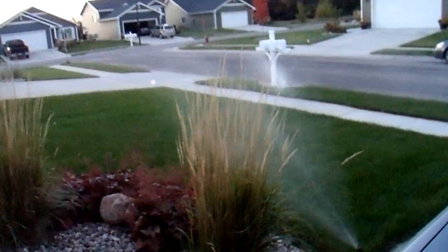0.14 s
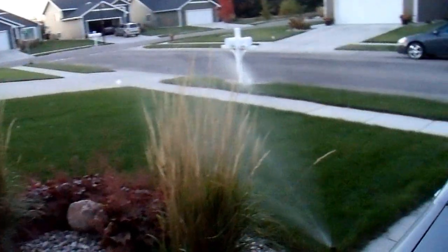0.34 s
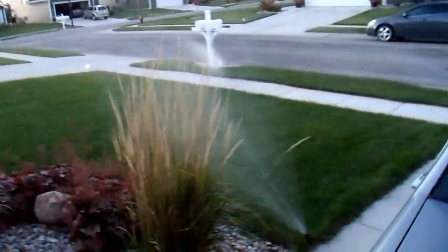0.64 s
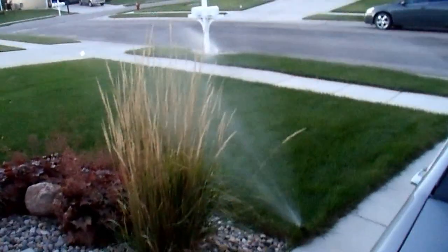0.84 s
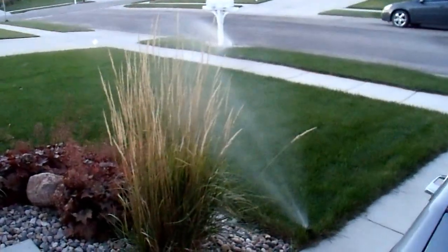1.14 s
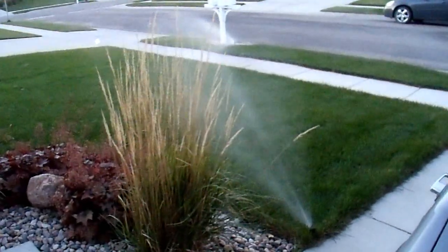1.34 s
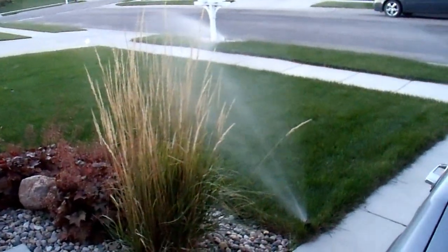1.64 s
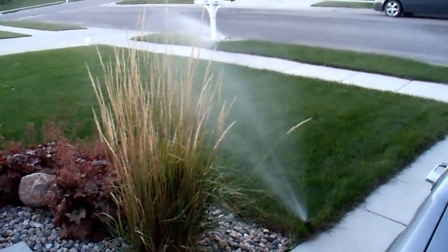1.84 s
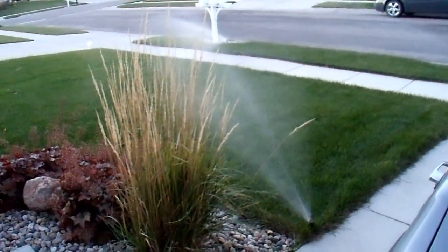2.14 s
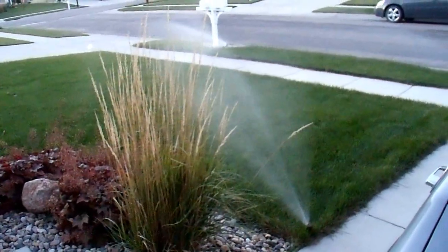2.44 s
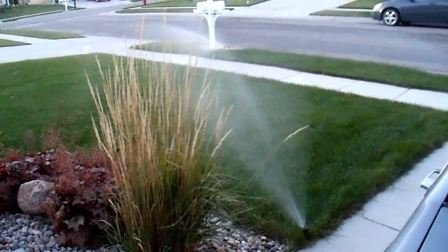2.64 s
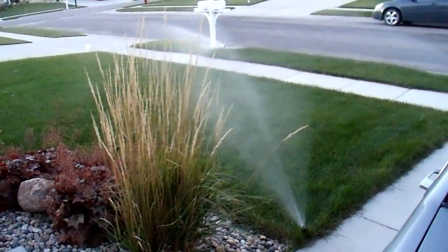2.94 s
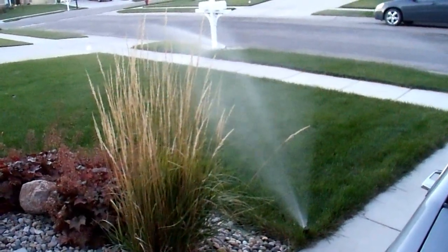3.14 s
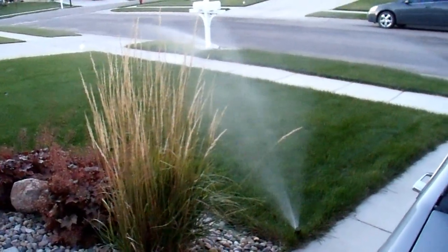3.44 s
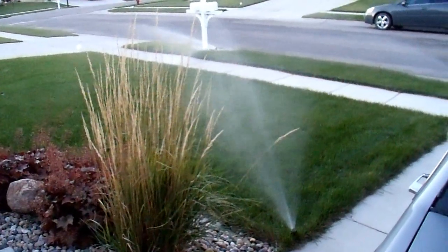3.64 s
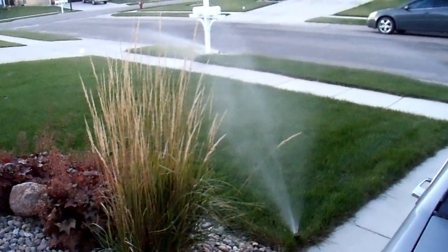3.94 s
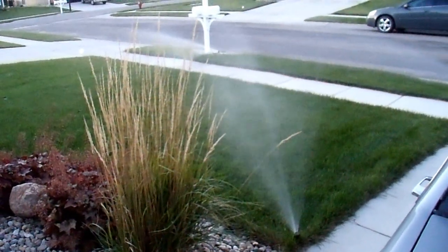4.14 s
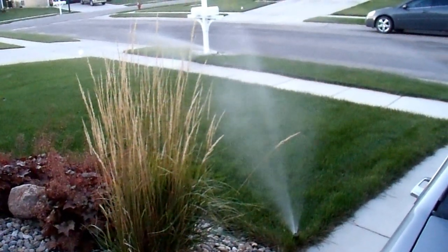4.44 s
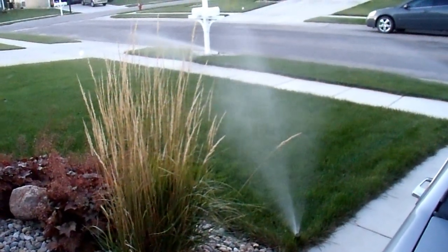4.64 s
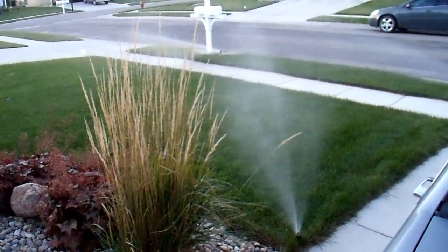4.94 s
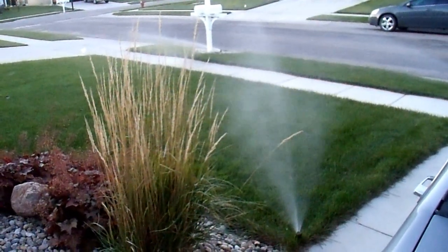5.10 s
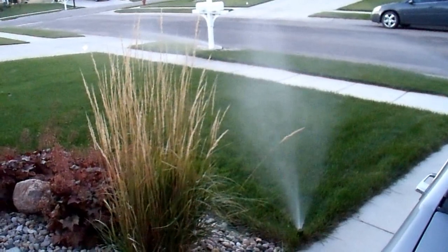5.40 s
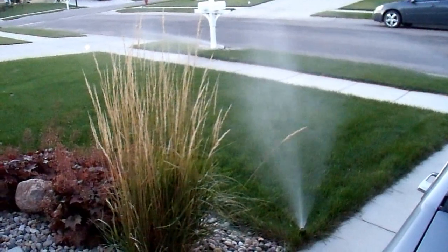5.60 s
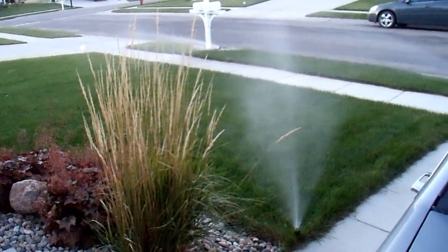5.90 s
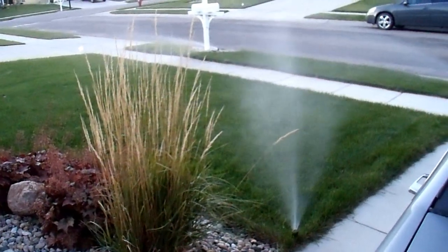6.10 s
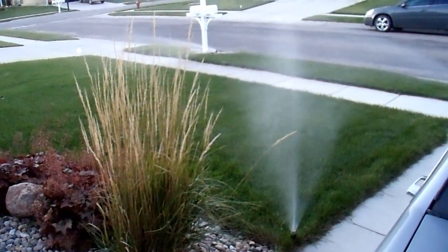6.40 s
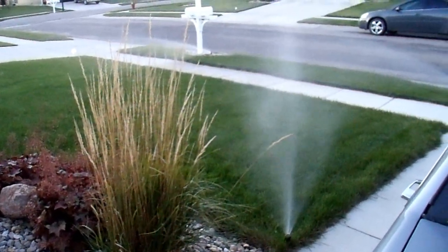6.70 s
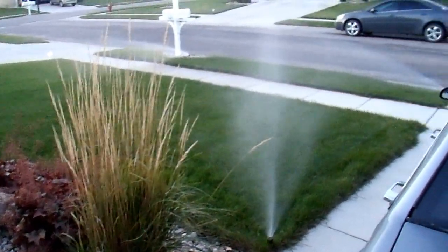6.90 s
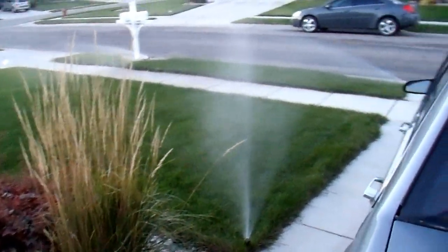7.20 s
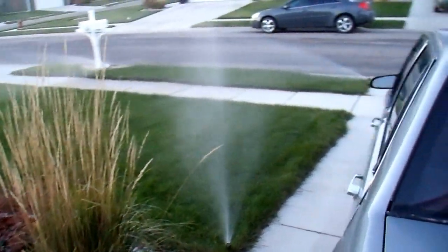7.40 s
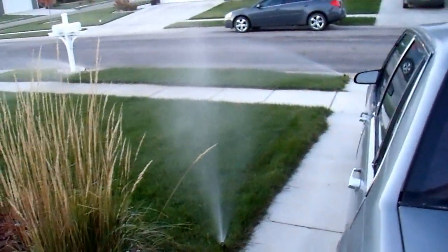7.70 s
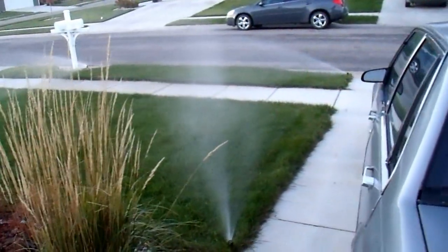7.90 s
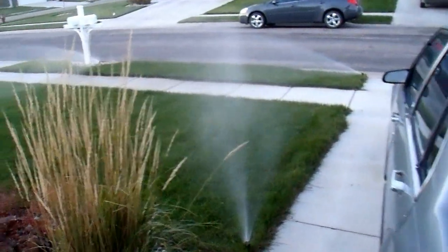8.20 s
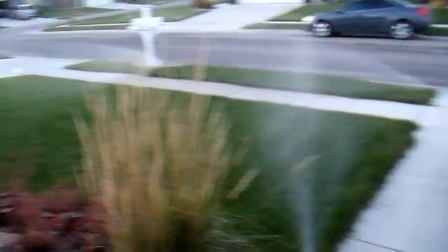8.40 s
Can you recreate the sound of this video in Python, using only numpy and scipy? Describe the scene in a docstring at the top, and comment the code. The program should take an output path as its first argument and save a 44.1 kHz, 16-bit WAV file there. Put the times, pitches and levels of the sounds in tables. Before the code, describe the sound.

A lawn sprinkler head crackles and spits over a soft mist hiss, calms briefly, then blasts a loud, ragged, bright hiss of air and water.

```python
"""A pop-up lawn sprinkler head, its line being cleared with compressed air, sprays water, spits as the first
air pockets reach it, calms, then blows a loud, ragged hiss of mist. The spitting is thousands of tiny noise
bursts coloured by the head's resonances; a smoother noise is the jet. A parked car beside the head throws
the hiss back until the listener steps along it, with soft rustling, taps and squeaks. Behind lie steady
noise from settling spray and the street, and a far compressor's hum made of slowly drifting sine waves."""
import sys
import numpy as np
from scipy import signal
from scipy.fft import rfft, irfft
from scipy.io import wavfile
from scipy.ndimage import uniform_filter1d

SR = 44100
rng = np.random.default_rng(int(sys.argv[2]) if len(sys.argv) > 2 else 0)


def digitize_waveform(pressure):
    """Quantize a signal to 16-bit integers and store it at the path in sys.argv[1].

    Rows of a 2-D input are taken as channels; values are limited to [-1, 1].
    """
    field = np.atleast_2d(pressure).T
    bounded = np.clip(field, -1, 1)
    quanta = np.round(bounded * 32767).astype(np.int16)
    wavfile.write(sys.argv[1], SR, quanta)


N = 377055
TIME = np.arange(N) / SR

# strength of the spitting, as one slug of air passes and then the main blast arrives,
# before surging, limiting and echoes: (time_s, level_db)
SPIT_LEVEL = [(0, -47.5), (1.56, -41.5), (1.7, -32), (1.97, -25.5), (2.38, -25), (2.6, -30), (2.78, -30),
              (3.03, -27.5), (3.16, -31), (3.65, -34), (3.98, -37.5), (4.2, -33.8), (4.56, -20.5),
              (4.95, -16.6), (6.9, -16.5), (7.78, -15), (8.23, -20), (8.3, -27)]


def gain_of(db):
    """Turns decibels into an amplitude factor."""
    return 10 ** (np.asarray(db) / 20)


def evened(x):
    """Scales a sound to an average strength (rms) of 1."""
    return x / np.sqrt(np.mean(x ** 2) + 1e-20)


def follow(curve, t=TIME):
    """Reads a curve of (time_s, value) rows at times t, with straight lines between the rows."""
    return np.interp(t, *np.transpose(curve))


def read(points, hz):
    """Reads a spectrum of (pitch_hz, level_db) rows, spacing pitch by octaves as the ear does."""
    f, db = np.transpose(points)
    return np.interp(np.log(hz + 1), np.log(f), db)


def add(mix, start_s, sound):
    """Lays a sound into the mix at its start time, cutting off what runs past the end."""
    part = mix[max(round(start_s * SR), 0):][:len(sound)]
    part += sound[:len(part)]


def noise(spectrum):
    """Steady noise of rms 1: each pitch of plain noise is raised or lowered to give the colour."""
    hz = np.fft.rfftfreq(N, 1 / SR)
    plain = rfft(rng.standard_normal(N))
    return evened(irfft(plain * gain_of(read(spectrum, hz)), N))


def wander(rate_hz):
    """Smooth random motion of rms 1: noise that fades out above about rate_hz."""
    hz = np.fft.rfftfreq(N, 1 / SR)
    plain = rfft(rng.standard_normal(N))
    return evened(irfft(plain / np.sqrt(1 + (hz / rate_hz) ** 4), N))


def bump(x, centre, width):
    """Bell curve of height 1 and the given width at half height."""
    return .5 ** ((2 * (x - centre) / width) ** 2)


def air_share(t=TIME):
    """How much of the flow is air, from 0 (all water) to 1 (all air)."""
    # air in the line: (time_s, air_share 0-1)
    air_curve = [(0, .45), (1.5, .05), (1.95, .38), (3.4, 0.01), (4.35, 0.46), (4.65, 0.82), (5.2, .95),
                 (8.05, 0.65), (8.3, .26)]
    return np.clip(follow(air_curve, t), 0, 1)


def sputter(wet_per_s=550, dry_per_s=1100, wet_spread_db=3.0, dry_spread_db=1.0,
            burst_s=0.0003, fizz=0.36, ceiling_db=-10):
    """Air tears through water in tiny bursts: few and uneven when wet, dense and alike when mostly air."""
    # the flow is unsteady, most of all while it is mainly water
    wet_surge_db, dry_surge_db, surge_hz = 1.1, 0.42, 8.3
    air = air_share()
    rate = wet_per_s + (dry_per_s - wet_per_s) * air
    spread_db = wet_spread_db + (dry_spread_db - wet_spread_db) * air
    size = gain_of(spread_db * np.clip(rng.standard_normal(N), -2, 2))
    strikes = size ** 2 * (rng.random(N) < rate / SR)
    # every strike dies away within a fraction of a millisecond
    age_s = np.arange(256) / SR
    power = np.maximum(signal.oaconvolve(strikes, np.exp(-age_s / burst_s))[:N], 0)
    # the surging flow through the line sets the mean power; the bursts share it out
    power /= uniform_filter1d(power, size=2000) + 1e-9
    surge_db = (wet_surge_db + (dry_surge_db - wet_surge_db) * air) * wander(surge_hz)
    flow = gain_of(follow(SPIT_LEVEL) + surge_db)
    # fizz is the steady part that fills the gaps between bursts
    envelope = flow * np.sqrt((power + fizz) / (1 + fizz))
    # no burst can be stronger than the line pressure allows
    envelope /= (1 + (envelope / gain_of(ceiling_db)) ** 4) ** (1 / 4)
    # random signs turn the envelope into noise
    return envelope * rng.choice([-1, 1], N)


def lesser_pockets(dry_share=.6, count=400):
    """Random (start_s, level_db) rows for small air pockets; they die out once the flow is mostly air."""
    # most pockets per second, their level above the spitting, and scatter either way
    most_per_s, over_db, scatter_db = 9, 7.5, 2
    when, luck, size = rng.random((count, 3)).T
    start_s = when * N / SR
    rate = most_per_s * np.clip(1 - air_share(start_s) / dry_share, 0, 1)
    level_db = follow(SPIT_LEVEL, start_s) + over_db + scatter_db * (2 * size - 1)
    # of the evenly scattered candidates, keep just enough to give the wanted rate
    kept = luck < rate * N / SR / count
    return list(zip(start_s[kept], level_db[kept]))


def pops(spatter_db=-15, spatter_s=0.0023, top_hz=13000, lift_db=1.5):
    """An air pocket: one sharp crack and a short spatter, a little duller than the small bursts."""
    # the largest single air pockets, before the lift and the dulling:
    # (start_s, level_db over one millisecond)
    large_pockets = [(.591, -28.5), (.932, -25), (1.315, -24.5), (1.348, -26), (1.959, -12.5),
                     (2.087, -14.5), (2.121, -14), (2.482, -14.5), (2.526, -15), (2.696, -12.5),
                     (3.01, -14), (3.079, -16.5), (3.689, -17.5), (3.772, -21.5), (3.995, -17),
                     (4.112, -19), (4.386, -15.5), (8.336, -10.5)]
    out, t = np.zeros(N), TIME[:SR // 40]
    crack = np.exp(-t / .00048)
    shape = crack + gain_of(spatter_db) * np.exp(-t / spatter_s)
    # same energy as a full-strength millisecond
    shape /= np.sqrt(np.sum(shape ** 2) / (SR // 1000))
    for start_s, level_db in large_pockets + lesser_pockets():
        add(out, start_s, gain_of(level_db + lift_db) * shape * rng.choice([-1, 1], len(t)))
    return signal.sosfilt(signal.butter(1, top_hz, fs=SR, output="sos"), out)


def head(drive, nozzle_width_hz=1150, nozzle_db=7, wet_damping_db=4, damped_below_hz=7500,
         wet_sparkle_db=4, sparkle_hz=15200, sparkle_width_hz=2600):
    """The stem and nozzle colour every burst; water damps the lower resonances and adds sparkle on top."""
    # basic colour of a burst, relative: (pitch_hz, level_db per Hz)
    burst_colour = [(300, -52), (1200, -43), (2000, -33.5), (3000, -28), (4300, -21.5), (6100, -15.5),
                    (7500, -13), (9200, -9.5), (10300, -6.5), (11500, -8), (12600, -9), (14000, -17.5),
                    (15700, -20)]
    # resonances of the pop-up stem: (pitch_hz, width_hz, lift_db)
    stem_modes = [(2110, 250, 3.5), (3510, 470, 7), (5200, 930, 8.5), (6950, 620, 4.5), (8290, 960, 6.5),
                  (9490, 290, 4), (11930, 270, 2.5), (13300, 580, 6.5), (14400, 500, 0.5)]
    # the nozzle's main resonance rises as air replaces water
    nozzle_wet_hz, nozzle_dry_hz = 10990, 11400
    # cut the sound into short overlapping slices, so that the colour can change with time
    hz, t, slices = signal.stft(drive, SR, nperseg=512, noverlap=384)
    hz = hz[:, None]
    air = air_share(t)
    stem_db = sum(db * bump(hz, mode_hz, width_hz) for mode_hz, width_hz, db in stem_modes)
    nozzle_hz = nozzle_wet_hz + (nozzle_dry_hz - nozzle_wet_hz) * air
    nozzle_lift_db = nozzle_db * bump(hz, nozzle_hz, nozzle_width_hz)
    sparkle_db = wet_sparkle_db * bump(hz, sparkle_hz, sparkle_width_hz)
    damping_db = wet_damping_db / (1 + (hz / damped_below_hz) ** 8)
    wet_db = (1 - air) * (sparkle_db - damping_db)
    colour = gain_of(read(burst_colour, hz) + stem_db + nozzle_lift_db + wet_db)
    # colour alone must not change the overall strength
    colour /= np.sqrt(np.mean(colour ** 2, axis=0))
    return signal.istft(slices * colour, SR, nperseg=512, noverlap=384)[1][:N]


def jet(lift_db=1, flutter_db=1.02, flutter_hz=40):
    """The fan of spray rushes more smoothly and lower than the spitting: gently fluttering noise."""
    # smooth rush, which opens up as the listener steps along the car, before the lift: (time_s, level_db)
    jet_level = [(0, -49.5), (1.1, -45), (4.0, -45), (4.7, -42.5), (7.15, -39.5), (7.25, -34), (8.2, -32.3),
                 (8.5, -28)]
    # colour of the rush, relative: (pitch_hz, level_db per Hz)
    rush_colour = [(300, -30), (1400, -19.5), (2200, -10.5), (3300, -0.5), (4600, 2.5), (5400, 0),
                   (6400, -3), (8000, -5.5), (11000, -5.5), (13000, -8.5), (15700, -14.5)]
    level_db = follow(jet_level) + lift_db + flutter_db * wander(flutter_hz)
    return gain_of(level_db) * noise(rush_colour)


def surroundings(x, scatter_db=-15, scatter_t60=0.068):
    """Close reflections off the car are delayed copies; drive and house wall add a thin, dying scatter."""
    # reflections off the car, before their reach is applied: (delay_ms, gain)
    car_echoes = [(3.288, .17), (3.447, -.09), (3.878, -.12), (4.375, -.07)]
    # how much of them reaches the listener: (time_s, factor)
    car_reach = [(0, 1.3), (3.8, 1.2), (4.8, 0.65), (7.1, 1.55), (7.35, .1)]
    echo = sum(gain * np.pad(x, (round(ms * SR / 1000), 0))[:N] for ms, gain in car_echoes)
    t = TIME[:SR // 4]
    # random reflections from 4 ms on, falling 60 dB in scatter_t60 seconds
    tail = rng.standard_normal(len(t)) * gain_of(-60 * t / scatter_t60) * (t > .004)
    scatter = signal.oaconvolve(x, tail / np.linalg.norm(tail))[:N]
    return x + follow(car_reach) * echo + gain_of(scatter_db) * scatter


def mist(level_db=-44):
    """The smooth, steady hiss of the other heads and of spray settling on grass."""
    # colour of the settling spray, relative: (pitch_hz, level_db per Hz)
    mist_colour = [(500, -21), (1500, -14), (2100, -0.5), (3300, 1.5), (5000, -2), (6300, -5.5),
                   (7400, 3.5), (8400, -8), (9300, 5), (10100, -10), (11000, 0), (12500, -3), (14200, -9),
                   (15700, -4.5)]
    return gain_of(level_db) * noise(mist_colour)


def yard(level_db=-50.5, swell_db=0.35, rumble_below_hz=350):
    """The even wash of the street is coloured noise; its low rumble slowly grows."""
    # colour of the wash before the rumble is changed, relative: (pitch_hz, level_db per Hz)
    yard_colour = [(25, -6.5), (45, -19), (100, -12.5), (160, -16.5), (270, -9.5), (390, -14.5),
                   (500, -4.5), (760, -4.5), (950, -6.5), (1350, -9.5), (1800, -7), (2400, -6.5),
                   (3500, -12.5), (6000, -60)]
    # the low end starts weaker and gains a little every second
    rumble_start_db, rumble_db_per_s = -3.5, .5
    wash = gain_of(level_db + swell_db * wander(1.8)) * noise(yard_colour)
    low = signal.sosfiltfilt(signal.butter(2, rumble_below_hz, fs=SR, output="sos"), wash)
    return wash + (gain_of(rumble_start_db + rumble_db_per_s * TIME) - 1) * low


def compressor(waver_db=0.5, drift=0.0011, drone_drift=.02):
    """A low, nearly pure far-off hum swells and then wavers slightly; a fainter, higher drone joins it."""
    # the drone comes and goes: (time_s at its height, width_s at half height, level_db at its height)
    drone_swells = [(2.65, .7, -71.5), (5.5, .6, -73)]
    hum_hz, drone_hz = 76.7, 192
    start_db, steady_db, rise_s = -82, -65, 2.3
    turns = np.cumsum(hum_hz * (1 + drift * wander(1))) / SR
    hum_db = np.interp(TIME, [0, rise_s], [start_db, steady_db])
    hum = gain_of(hum_db + waver_db * wander(2)) * evened(np.sin(2 * np.pi * turns))
    turns = np.cumsum(drone_hz * (1 + drone_drift * wander(1.8))) / SR
    swells = sum(gain_of(db) * bump(TIME, s, width_s) for s, width_s, db in drone_swells)
    return hum + swells * evened(np.sin(2 * np.pi * turns))


def taps():
    """Light handling taps: each sets off a handful of pitches that ring briefly and die away."""
    # (start_s, peak_db, brightness_db per octave)
    tap_list = [(.016, -34, 9), (.044, -32, -2), (.134, -34, 10), (.154, -33, 2), (.162, -23, 0),
                (0.1703, -30, 9), (.366, -34, 7), (.492, -38, 6), (1.175, -29, 2), (1.318, -26, 4)]
    # what the taps ring with, before brightness: (pitch_hz, level_db, t60_s to fall by 60 dB)
    case_modes = [(620, -25, .03), (1020, -2.5, .03), (1650, -11, .008), (2150, 0, .012),
                  (2660, 11, 0.0078), (3500, 2, .005), (4400, -8, .004), (5200, -12, .003)]
    out, t = np.zeros(N), TIME[:SR // 10]
    high_pass = signal.butter(3, 550, "high", fs=SR, output="sos")
    for start_s, peak_db, tilt_db in tap_list:
        ring = np.zeros(len(t))
        for hz, db, t60 in case_modes:
            # a harder contact favours the higher modes
            fading = gain_of(db + tilt_db * np.log2(hz) - 60 * t / t60)
            ring += fading * np.sin(2 * np.pi * hz * t)
        ring = signal.sosfilt(high_pass, ring)
        add(out, start_s, gain_of(peak_db) * ring / abs(ring).max())
    return out


def squeaks(squeak_hz=2140, squeak_jitter=0.0035):
    """Faint squeaks: a single tone with a slightly shaky pitch, softly faded in and out."""
    # (start_s, length_s, level_db)
    squeak_list = [(.175, .05, -56), (.247, .075, -51), (.35, .15, -52), (.82, .043, -52)]
    loudness = np.zeros(N)
    for start_s, length_s, db in squeak_list:
        add(loudness, start_s, gain_of(db) * signal.windows.tukey(round(length_s * SR), .7))
    turns = np.cumsum(squeak_hz * (1 + squeak_jitter * wander(90))) / SR
    return loudness * evened(np.sin(2 * np.pi * turns))


def rustle(flutter_db=2, flutter_hz=9.7):
    """Soft rustle of moving about: dull, fluttering noise, with one short early brush."""
    # loudness of the rustle before flutter: (time_s, level_db)
    rustle_level = [(0, -84), (4.3, -76), (5, -65.5), (7.15, -66), (7.3, -55.5), (7.7, -54), (8.55, -54)]
    # its colour, relative: (pitch_hz, level_db per Hz)
    rustle_colour = [(30, -8), (140, -2.5), (280, 5.5), (410, -2), (520, 2), (800, 3), (1300, -9),
                     (3000, -26), (8000, -40)]
    brush_s, brush_width_s, brush_db = 1.32, .07, -58
    brush = gain_of(brush_db) * bump(TIME, brush_s, brush_width_s)
    rubbing = gain_of(follow(rustle_level)) + brush
    return rubbing * gain_of(flutter_db * wander(flutter_hz)) * noise(rustle_colour)


def scene():
    """The sprinkler in its surroundings, over the quiet background and the close handling sounds."""
    sprinkler = surroundings(head(sputter() + pops()) + jet())
    background = mist() + yard() + compressor()
    handling = taps() + squeaks() + rustle()
    return (sprinkler + background + handling)[None]


def record(dry):
    """A steep filter takes away the treble above about 15.8 kHz."""
    low_pass = signal.firwin(1023, 15800, window=("kaiser", 9), fs=SR)
    return signal.oaconvolve(dry, low_pass[None], "same")


dry = scene()
out = record(dry)
digitize_waveform(out)
```